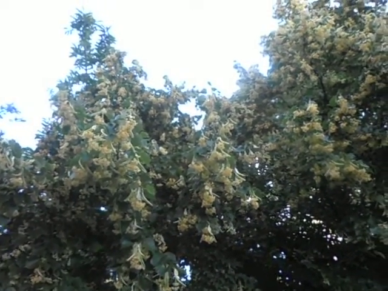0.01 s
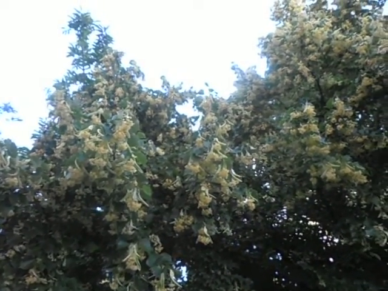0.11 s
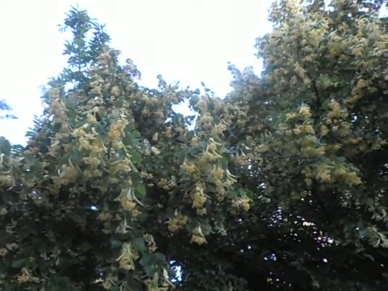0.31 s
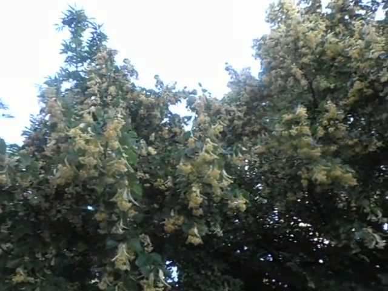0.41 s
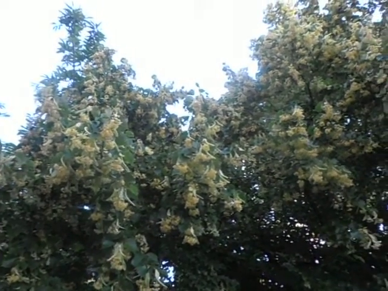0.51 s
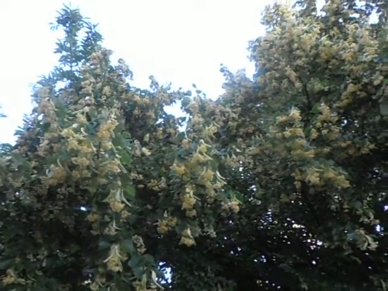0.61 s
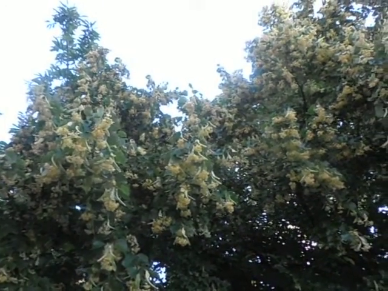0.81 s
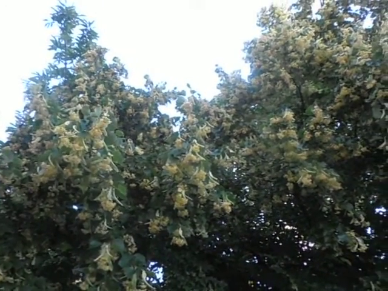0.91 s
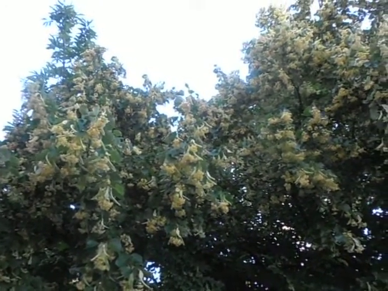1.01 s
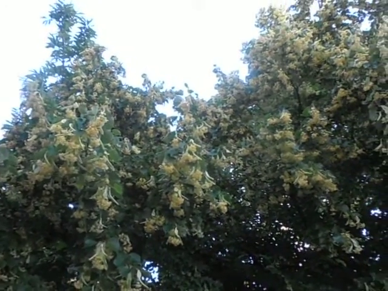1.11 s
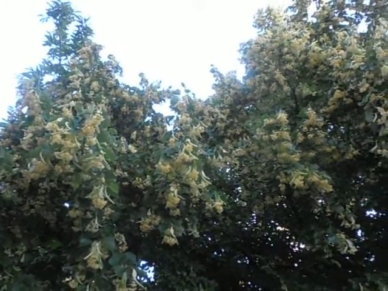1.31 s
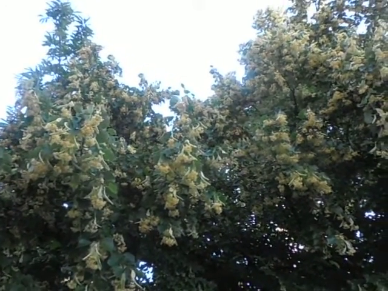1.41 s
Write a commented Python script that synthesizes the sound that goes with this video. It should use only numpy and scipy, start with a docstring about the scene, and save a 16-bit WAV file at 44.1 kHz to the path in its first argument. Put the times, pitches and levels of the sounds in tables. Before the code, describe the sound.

Many bees hum softly in a garden tree throughout, swelling unevenly, most around 1.1 and 1.3 seconds. At about 0.25 seconds one sharp, much louder plastic click hits right at the microphone. A songbird trills and whistles with slight echo from the start until 0.7 seconds. A second bird peeps faintly between 0.5 and 1.2 seconds. Soft air, hiss and a thin, high, pulsing whine lie underneath.

```python
"""A hum of many bees in a flowering tree, swelling irregularly as their wing tones beat together.
A songbird trills and whistles, scattered by leaves and garden walls; a second bird peeps faintly.
Right at the microphone, a small camera's plastic case clicks once under a finger and overloads it.
The camera's electronics hiss and whine faintly, the whine pulsing with the frame rate."""
import sys
import numpy as np
from scipy import signal
from scipy.fft import rfft, irfft
from scipy.io import wavfile
from scipy.ndimage import uniform_filter1d

SR = 44100
rng = np.random.default_rng(int(sys.argv[2]) if len(sys.argv) > 2 else 0)


def output_pcm(signal):
    """Save a mono or channel-first signal as 16-bit PCM at the path in sys.argv[1].

    Samples are clipped to [-1, 1] before scaling.
    """
    pcm = np.clip(np.atleast_2d(signal).T, -1, 1) * 32767
    wavfile.write(sys.argv[1], SR, np.round(pcm).astype(np.int16))


N = 66150


def undb(db):
    """Decibels to gain."""
    return np.exp(np.asarray(db) * (np.log(10) / 20))


def level(x, db):
    """Set the rms level."""
    return x * undb(db) / np.sqrt(np.mean(x ** 2))


def drift(rate_hz):
    """Smooth random drift with a spread near 1."""
    hold = int(SR / rate_hz)
    steps = np.repeat(rng.standard_normal(N // hold + 4), hold)
    start = rng.integers(hold)
    return 1.3 * uniform_filter1d(uniform_filter1d(steps, hold), hold)[start:start + N]


def noise(colour):
    """Noise at unit rms, shaped by rows of f/Hz, relative density/dB."""
    hz, db = np.array(colour).T
    bin_hz = np.maximum(np.fft.rfftfreq(N, 1 / SR), 1)
    gain = undb(np.interp(np.log(bin_hz), np.log(hz), db))
    return level(irfft(rfft(rng.standard_normal(N)) * gain, N), 0)


def swarm(t, count=32, wingbeat_hz=179.5, spread=.046, wander=.034, swell_db=2.5):
    """Bees in the tree: each repeats its own wing stroke, swelling and fading as it turns among leaves."""
    # wingbeat harmonics, from the first up: relative level/dB
    harmonics = [-8.5, -1, -6.5, -7.5, -7.5, -8.5, -13, -23.5, -30, -25]
    hum, size = 0, 1024
    cycle = 2 * np.pi * np.arange(size) / size
    for rank in np.linspace(-1, 1, count):
        hz = wingbeat_hz * (1 + spread * np.arcsin(rank) + wander * drift(14))
        stroke = sum(undb(db) * np.sin(k * cycle + 2 * np.pi * rng.random())
                     for k, db in enumerate(harmonics, 1))
        position = (np.cumsum(hz) / SR * size).astype(int) % size
        hum = hum + undb(swell_db * drift(5)) * stroke[position]
    return level(hum, -46.5)


def hum_swells(t, wander=.02844, trim_db=-2):
    """The hum's strongest partial swells and fades irregularly as the bees' tones beat together."""
    # that partial, at twice the wingbeat: t/s, f/Hz, level/dB before the trim
    swells = [(0, 350.9, -56), (0.169, 374.2, -68), (.255, 361.4, -53), (.35, 356, -45.5), (.4, 374, -63),
              (0.499, 364.7, -45.5), (0.579, 357.8, -55), (.64, 337.5, -70), (.76, 370, -51),
              (1, 365.3, -72), (1.065, 368, -40), (1.17, 355, -60), (1.261, 366.5, -67),
              (1.288, 370.5, -38), (1.315, 366, -59), (1.391, 365.8, -45), (1.42, 364.6, -40.5),
              (1.5, 372, -50.5)]
    when, hz, db = np.array(swells).T
    pitch = np.interp(t, when, hz) * (1 + wander * drift(25.294))
    tone = np.sqrt(2) * np.sin(2 * np.pi * np.cumsum(pitch) / SR)
    return undb(np.interp(t, when, db) + trim_db) * tone


def garden_air(level_db=-51, swell_db=.5):
    """Soft, slightly wavering air all around, with some microphone hiss."""
    # colour of the air and hiss: f/Hz, relative density/dB
    colour = [(15, 11.5), (30, -7.5), (70, -3.5), (140, -5), (260, -6.5), (450, -5), (900, -11),
              (1200, -9.5), (1600, -27), (2500, -23), (6000, -37)]
    return undb(level_db + swell_db * drift(11.5)) * noise(colour)


def electronics(t, hiss_db=-51.5, frame_hz=30):
    """Inside the camera: even hiss, and thin tones that step up and down once a frame."""
    # whine tones: f/Hz, level/dB, pulse depth (0-1), t/s of one pulse
    whine = [(7867, -54, .42, 0.015), (12710, -65.5, .9, .033), (5890, -70.5, 0.4, .01)]
    out = undb(hiss_db) * noise([(100, 12.5), (2000, 2), (4500, -.5), (8500, .5), (12000, -2.5), (15700, -6)])
    for hz, db, depth, when in whine:
        pulse = np.tanh(4 * np.cos(2 * np.pi * frame_hz * (t - when)))
        out += undb(db) * (1 + depth * pulse) * np.sin(2 * np.pi * hz * t)
    return out


def whistles(t, notes, rasp, edge_share=.33):
    """Bird notes, each gliding in an arc through three pitches; a fast pitch waver roughens them."""
    out, waver = np.zeros(N), 1 + rasp * drift(700)
    for start, length, first, middle, last, db in notes:
        now = (t > start) & (t < start + length)
        along = (t[now] - start) / length
        hz = first + (last - first) * along + 2 * (2 * middle - first - last) * along * (1 - along)
        swell = np.sin(np.pi / 2 * np.clip(np.minimum(along, 1 - along) / edge_share, 0, 1))
        phase = 2 * np.pi * np.cumsum(hz * waver[now]) / SR
        out[now] += undb(db) * swell * np.sqrt(2) * np.sin(phase)
    return out


def songbird(t, direct_db=-3, echo_db=.5):
    """A bird across the garden, heard a little more by its echoes than directly."""
    # trills and whistles: t/s, length/s, first f/Hz, middle f/Hz, last f/Hz, relative level/dB
    notes = [(-.01, 0.038, 4230, 3234, 2410, -47.5), (0.048, .025, 4307, 3380, 2610, -44.5),
             (0.086, .03, 4214, 3160, 2400, -50), (0.139, 0.018, 4000, 3097, 2660, -48.5),
             (0.277, .187, 2386, 3912, 4315, -41.5), (0.54, 0.026, 4600, 5510, 5480, -46),
             (.553, 0.023, 5290, 4400, 3583, -45.5), (.578, 0.047, 2546, 3410, 3970, -40.5),
             (0.607, .034, 3900, 3154, 2824, -42.5), (0.634, 0.049, 2864, 2430, 2240, -53)]
    song = whistles(t, notes, rasp=.0347)
    return undb(direct_db) * song + undb(echo_db) * garden_echoes(song, t)


def garden_echoes(sound, t, t60_s=.44, rise_s=.0013):
    """Dense echoes from foliage and walls."""
    echoes = rng.standard_normal(N) * np.exp(-np.log(1000) * t / t60_s) * (1 - np.exp(-t / rise_s))
    return signal.fftconvolve(sound, echoes / np.sqrt(np.sum(echoes ** 2)))[:N]


def case_click(t, contact_s=.00025, ring_rise_s=.0013):
    """A finger clicks the plastic case, right at the microphone: each contact cracks and rings it."""
    # catch, snap and rebound: t/s, ring gain/dB, crack gain/dB, crack decay/s
    contacts = [(0.233, 0.5, -5, 0.0011), (0.2374, 3, -1, 0.0018), (0.2485, -14, -18, 0.00047)]
    # modes of the case: f/Hz, relative level/dB, t60/s
    modes = [(616, -27.5, 0.024), (1025, -10.5, 0.016), (1737, -9, 0.024), (2184, 3.5, 0.011),
             (2478, -8, .016), (2110, -47.5, 0.31), (3600, -21, .02), (5810, -16, 0.013),
             (7000, -34, 0.0062), (7570, -10, 0.011), (7730, -8.5, 0.0087), (9140, -17, 0.013)]
    # colour of the crack: f/Hz, relative density/dB
    colour = [(40, -9.5), (130, -8), (300, -32), (600, -5.5), (1100, -8.5), (2200, -4.5), (4000, 0),
              (8000, 1), (11000, -6.5), (13800, -4.5), (16000, -36)]
    out, crack = np.zeros(N), noise(colour)
    ring = sum(undb(db) * np.exp(-np.log(1000) * t / t60) * np.sin(2 * np.pi * hz * t)
               for hz, db, t60 in modes)
    ring *= 1 - np.exp(-t / ring_rise_s)
    for start, ring_db, crack_db, decay in contacts:
        i = int(start * SR)
        burst = np.exp(-t / decay) * (1 - np.exp(-t / contact_s))
        out[i:] += undb(ring_db) * ring[:N - i] + undb(crack_db) * crack[i:] * burst[:N - i]
    return out


def second_bird(t):
    """Faint, thin calls, heard without echo."""
    # peeps: t/s, length/s, first f/Hz, middle f/Hz, last f/Hz, level/dB
    peeps = [(.47, .045, 6600, 6100, 5700, -66), (0.699, .058, 6300, 5100, 4830, -58),
             (.96, 0.0281, 4280, 4850, 5054, -60.5), (1.128, 0.029, 5400, 4659, 4700, -61)]
    return whistles(t, peeps, rasp=.0089)


def scene():
    """Birds, air and bees from one spot in the garden, with the camera's own sounds, in mono."""
    t = np.arange(N) / SR
    garden = songbird(t) + second_bird(t) + garden_air() + swarm(t) + hum_swells(t)
    return (garden + case_click(t) + electronics(t))[None]


def record(dry, ceiling=.8, top_hz=16000):
    """The camera's microphone overloads softly on the click; the highest treble is cut."""
    overloaded = ceiling * np.tanh(dry / ceiling)
    return signal.sosfilt(signal.ellip(8, .2, 70, top_hz, fs=SR, output="sos"), overloaded)


dry = scene()
out = record(dry)
output_pcm(out)
```